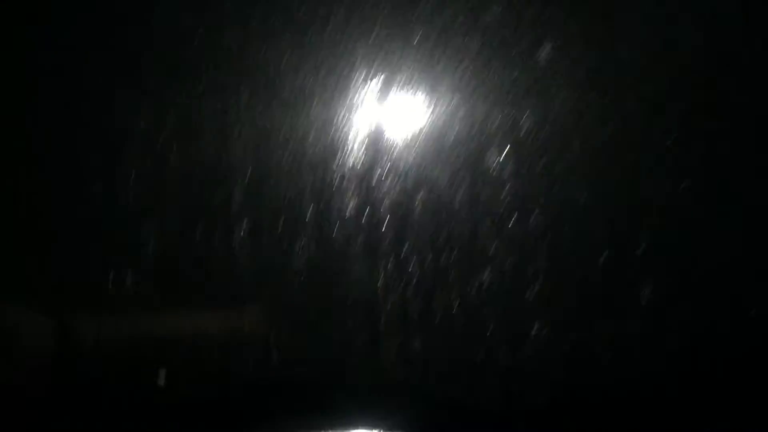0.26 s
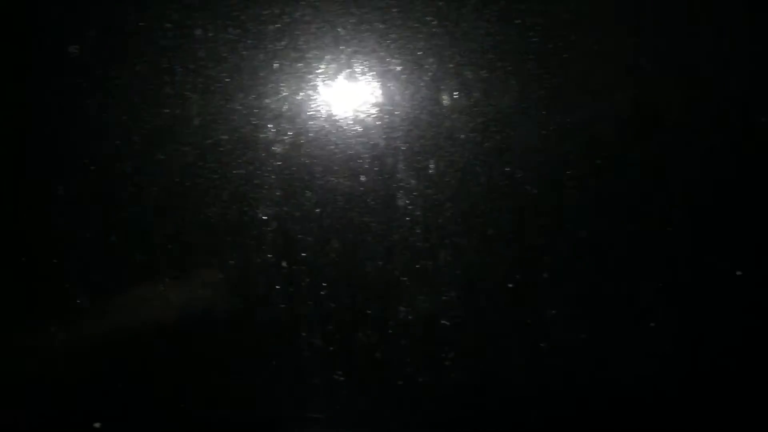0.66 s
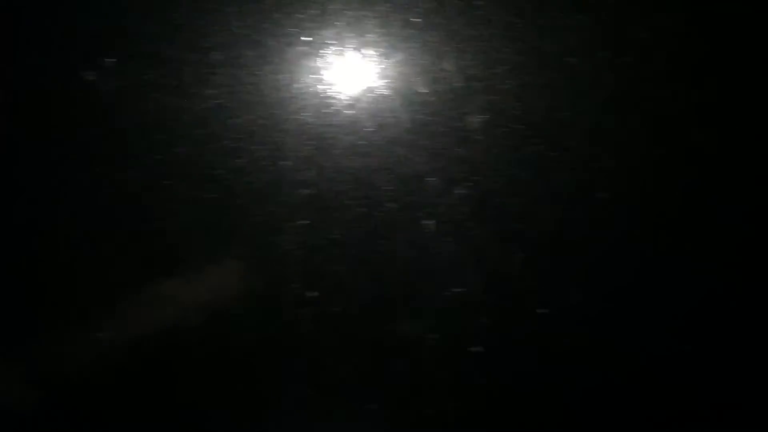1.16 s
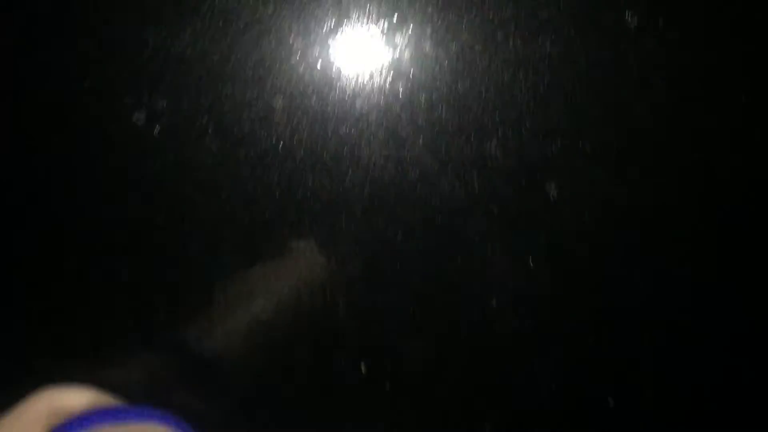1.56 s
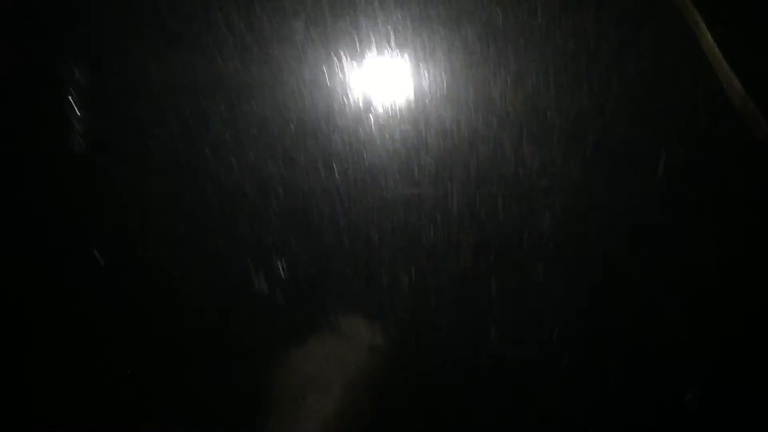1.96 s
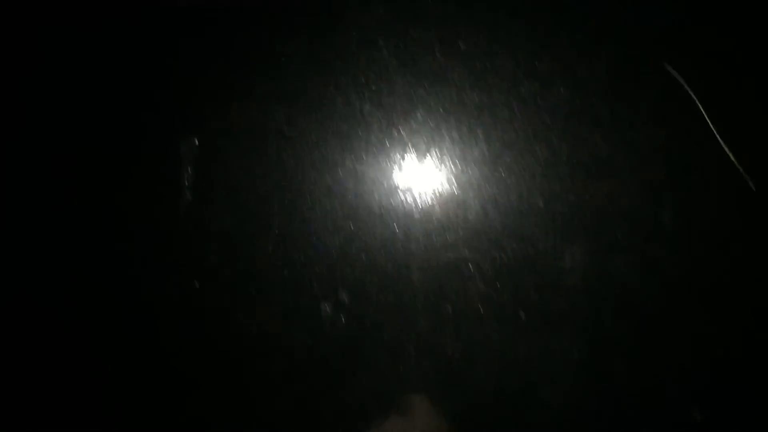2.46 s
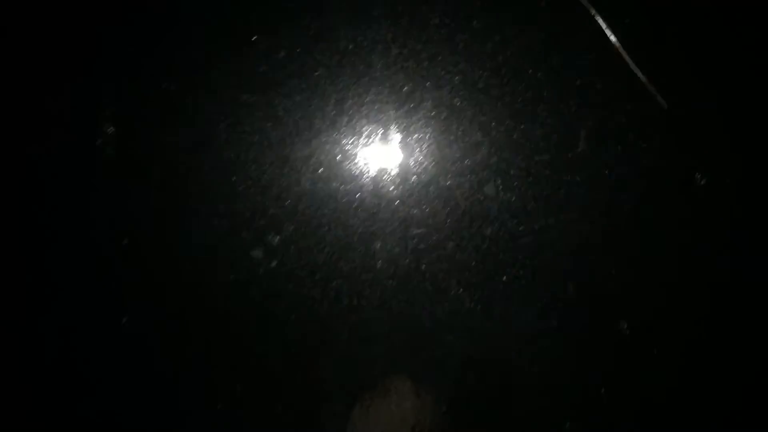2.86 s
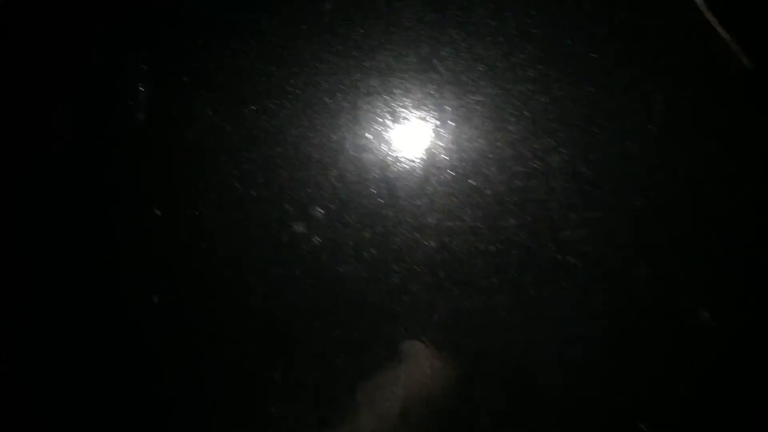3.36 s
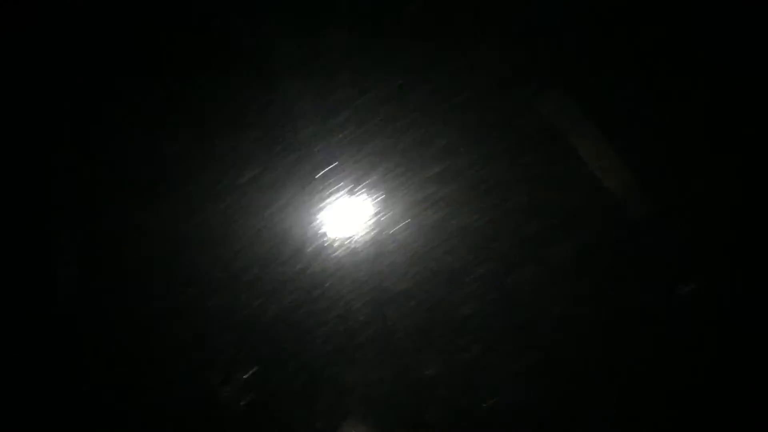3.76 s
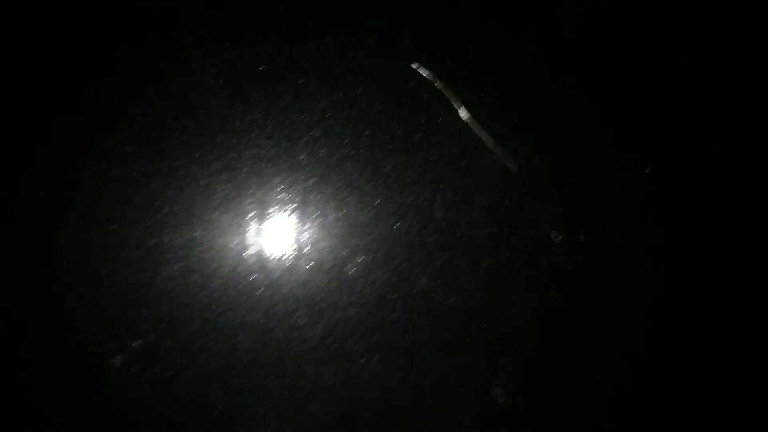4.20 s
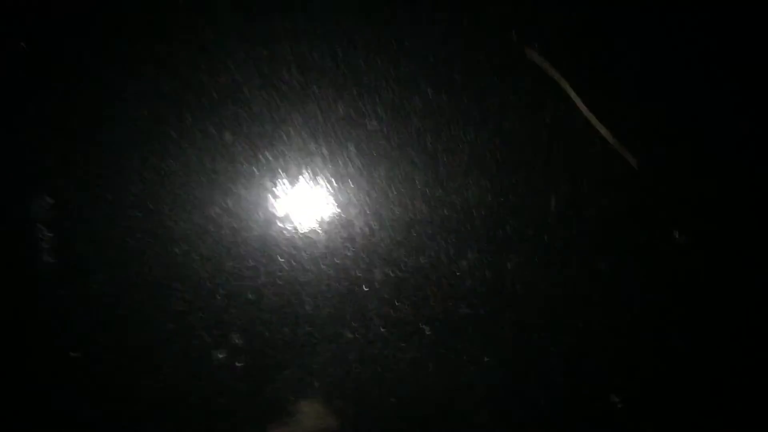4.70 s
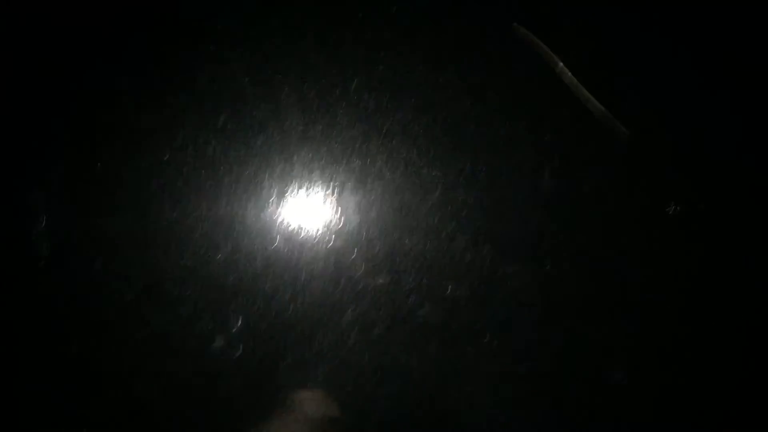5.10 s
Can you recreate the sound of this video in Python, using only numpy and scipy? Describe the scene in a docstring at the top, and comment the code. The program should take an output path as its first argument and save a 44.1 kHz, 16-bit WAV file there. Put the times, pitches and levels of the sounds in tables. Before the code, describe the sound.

Night outdoors, nearly silent, with a faint even hush of air and a close microphone. Tiny dry metal ticks begin near 0.1 s; soft, muffled snow presses come at 0.55, 1.0, 1.1 and 1.6 s, with a brittle, briefly ringing snap at 0.96. At 2.07 s the loudest step breaks through: a hard crack, deep thud, coarse crunch and fizzing ice grains, dying within about a quarter second. Small high clicks and faint creaks follow around 2.3-2.6 s. A duller double step lands at 3.1-3.2 s with little cracks, then a strong, crisp crunch at 3.57. Quiet metal ticks and soft creaking fill the gap until a moderate, low step at 4.6. From 4.9 s muffled steps bunch together, with light rattling ticks between them; a sharper crunch and snap at 5.23 and a faint last press at 5.3 end it.

```python
"""Footsteps in crusted snow on a still night: each boot breaks the crust in bursts of tiny fractures.
Random impulses, shaped by the boot's force and by filters, give a low thud, a crunch and fizzing ice grains.
Single plates crack, and brittle pieces snap with a noise burst and a few ringing sine tones.
The settling snow creaks in filtered small slips. A small metal part, like a zip pull, clicks and rings.
Behind it all lies the faint hush of the open air, made of filtered noise."""
import sys
import numpy as np
from scipy import signal
from scipy.fft import rfft, irfft, next_fast_len
from scipy.io import wavfile
from scipy.ndimage import uniform_filter1d, map_coordinates

SR = 44100
rng = np.random.default_rng(int(sys.argv[2]) if len(sys.argv) > 2 else 0)


def materialize(psi):
    """Save the field psi as 16-bit PCM at rate SR to the path in sys.argv[1].

    A 1-D psi becomes a single channel; in a 2-D psi each row is a channel.
    """
    bounded = np.clip(np.atleast_2d(psi).T, -1, 1)
    quanta = np.round(bounded * 32767).astype(np.int16)
    wavfile.write(sys.argv[1], SR, quanta)


N = 235561
T = np.arange(SR // 2) / SR  # seconds within one event

# Tone of the open air. Each row: frequency in Hz, gain in dB.
AIR_TONE = [(15, -59), (25, -21), (76, 0.5), (242, -6.5), (335, -6.5), (439, -11.5), (962, -8), (1130, -11),
            (1400, -13.5), (2410, -18.5), (6050, -25), (7510, -26.5), (14400, -31.5), (16000, -34)]
# Moments when the weight shifts. Each row: start in seconds, length in seconds, creak level in dB.
WEIGHT_SHIFTS = [(0.669, 0.11, -51), (2.263, 0.073, -47), (2.414, 0.093, -49.5), (3.764, 0.13, -51),
                 (3.964, 0.047, -51), (4.766, 0.047, -58), (4.896, 0.078, -45), (5.138, 0.17, -47)]
# Tone of the creaking snow. Each row: frequency in Hz, gain in dB.
CREAK_TONE = [(24, -14), (40, -17.5), (86, 0.5), (220, -16.5), (334, -1), (396, -24), (463, -18.5),
              (556, -28), (843, -33), (900, -24.5), (1170, -72), (1980, -120)]
# Metal ticks. Each row: start in seconds, click pitch in Hz, click level in dB, ring level in dB.
METAL_TICKS = [(0.069, 6000, -54.5, -54.5), (0.563, 5530, -46.5, -67), (0.724, 5540, -57, -67),
               (1.533, 5500, -59, -78), (2.331, 5390, -49, -76), (2.367, 11780, -51.5, -46),
               (2.38, 5360, -43, -60), (2.572, 12300, -41.5, -35.5), (2.616, 5660, -47.5, -66),
               (3.251, 11800, -53, -68), (3.868, 11530, -43.5, -48), (4.069, 11500, -45, -58.5),
               (4.211, 5460, -51.5, -72), (4.66, 11700, -50, -56.5), (4.867, 5800, -43, -67),
               (4.932, 12000, -42.5, -55.5), (5.048, 12240, -52, -47.5), (5.176, 11700, -46.5, -56)]
# Tone of the dry click. Each row: frequency in Hz, gain in dB.
CLICK_TONE = [(1500, -17), (3500, -9), (5400, 0.5), (7500, -4.5), (9800, -11), (11700, -6), (13000, -9),
              (16000, -14)]
# Ring of the metal part. Each row: frequency in Hz, level in dB, time to fall 60 dB in seconds.
METAL_RING = [(13160, -16, .05), (14200, 1, 0.065)]
# The span in which fainter ticks fall at random: first and last time in seconds.
RATTLE_SPAN = (4.25, 5.25)
# Brittle pieces of crust that snap. Each row: start in seconds, level in dB.
SNAP_EVENTS = [(0.961, -20), (2.0701, -24), (3.174, -35), (5.234, -28.5)]
# Tone of a snapping piece. Each row: frequency in Hz, gain in dB.
BRITTLE_TONE = [(100, -36), (250, -18), (550, -7), (760, -11.5), (1150, 2), (1450, -5.5), (1900, -16.5),
                (3000, -20), (7000, -26.5), (16000, -39)]
# Ring of a snapped piece. Each row: frequency in Hz, level in dB, time to fall 60 dB in seconds.
SHARD_RING = [(1130, -5.5, 0.11), (1907, -23, 0.24), (2380, -13, .07)]
# Tone of the packed snow. Each row: frequency in Hz, gain in dB.
PACK_TONE = [(40, -39.5), (135, -14.5), (180, 2.5), (330, 1.5), (480, -7), (600, -17), (1000, -39.5),
             (3000, -83)]
# Tone of the crust. Each row: frequency in Hz, gain in dB.
CRUST_TONE = [(250, -22), (550, -5.5), (750, 4.5), (1000, 3), (1250, -6.5), (1550, 0.5), (1900, -10),
              (2700, -13.5), (4200, -22.5), (9000, -55)]
# Tone of the ice grains. Each row: frequency in Hz, gain in dB.
GRIT_TONE = [(1200, -48), (3000, 6), (4300, 2.5), (6500, -1.5), (8000, -8.5), (12000, -21.5),
             (16000, -16.5)]
# Tone of the ground under the boot. Each row: frequency in Hz, gain in dB.
PUSH_TONE = [(25, -37.5), (45, -14), (68, -2), (98, 4), (125, -2.5), (170, -23.5), (500, -71.5)]
# Tone of a splitting plate of crust. Each row: multiple of the plate's pitch, gain in dB.
PLATE_TONE = [(.25, -14), (.55, -11), (1, 0.5), (1.5, -12), (2, -23), (5, -50.5)]
# Single cracks in the crust. Each row: start in seconds, level in dB, plate pitch in Hz.
CRACK_EVENTS = [(1.636, -54, 3080), (2.113, -31.5, 2010), (3.2334, -34, 1840), (3.634, -28.5, 1520),
                (4.536, -61.5, 2430), (4.976, -47.5, 2320), (5.032, -49, 2300)]
# Boots pressing down. Each row: start in seconds, sinking time in seconds, weight level in dB,
# crust level in dB, deep push level in dB, pitch of the hollow in Hz, pitch of the plate in Hz.
BOOT_STEPS = [ (0.554, 0.0046, -36.5, -53.5, -42, 326, 1200), (0.964, 0.046, -45, -44.5, -53, 398, 1225),
              (1.13, 0.009, -47.5, -61, -61.5, 268, 1230), (1.635, 0.0021, -39, -54, -57, 290, 693),
              (2.0693, .017, -9, -18.5, -16.5, 186, 1030), (3.0973, 0.046, -16.5, -35.5, -29.5, 215, 1120),
              (3.168, .03, -20.5, -37, -32, 518, 1500), (3.57, 0.046, -13, -20.5, -22, 447, 930),
              (4.617, 0.027, -29.5, -42, -28.5, 331.5, 1650), (4.949, 0.059, -27.5, -47, -40.5, 217, 2320),
              (4.997, 0.042, -20, -41, -32.5, 191, 1310), (5.189, 0.076, -42, -54.5, -38.5, 226, 1470),
              (5.233, 0.019, -17.5, -30, -20.5, 220, 950), (5.314, 0.037, -38.5, -56, -45, 198, 1850)]

AIR_DB = -65.5
RATTLE_HZ, RATTLE_DB, RATTLE_RING_DB = 11760, -58, -66.5  # click pitch, click level, ring level
STEP_T60_S = 0.25  # seconds for the pack to fall 60 dB, alike under every step
# Level at a crust level of 0 dB, then dB gained per dB of crust:
CRACK_DB, CRACK_GROWS = -9.5, 0.72  # the opening crack
GRIT_DB, GRIT_GROWS = -17.5, 1.112  # the ice grains
FIRST_SLIP, POWDER = 7.4, 0.22  # first slip and smooth noise, next to the other slips at rms 1
TOP_HZ = 16000  # nothing is kept from here up


def amp(db):
    """Turn decibels into gain."""
    return 10 ** (np.asarray(db) / 20)


def unit(x):
    """Scale a sound to an average (rms) level of 1."""
    return x / np.sqrt(np.mean(x ** 2) + 1e-20)


def fade(t, t60):
    """Stay at full level before t = 0, then fall 60 dB every t60 seconds."""
    return np.exp(-np.log(1000) * np.maximum(t, 0) / t60)


def add(track, start_s, sound):
    """Mix a sound into the track at start_s seconds."""
    room = track[round(start_s * SR):][:len(sound)]
    room += sound[:len(room)]


def colour(x, points, peak_hz=1, peak_db=0, octaves=0.22):
    """Filter through the (Hz, dB) points, with one optional resonance and no sound ahead of its cause."""
    m = 2 * next_fast_len(len(x) // 2 + SR // 8)
    pitch = np.log2(np.fft.rfftfreq(m, 1 / SR) + 1)
    hz, db = np.transpose(points)
    gain_db = np.interp(pitch, np.log2(hz), db)
    gain_db = gain_db + peak_db / (1 + ((pitch - np.log2(peak_hz)) / octaves) ** 2)
    # folding the cepstrum forward in time gives the minimum-phase filter
    cepstrum = irfft(np.log(amp(gain_db)))
    cepstrum[1:m // 2] *= 2
    cepstrum[m // 2 + 1:] = 0
    response = np.exp(rfft(cepstrum))
    return irfft(rfft(x, m) * response, m)[:len(x)]


def fractures(n, rate, spread_db):
    """Irregular tiny impulses of unequal size, about rate a second, at rms 1."""
    hit = rng.random(n) < rate / SR
    sign = rng.choice([-1, 1], n)
    size = amp(spread_db * np.clip(rng.standard_normal(n), -2, 2))
    return unit(hit * sign * size)


def energy(x):
    """Average power around each moment, over 1/40 s."""
    return np.abs(uniform_filter1d(x ** 2, size=SR // 40, mode="constant"))


def burst(grains, force, points, peak_hz=1, peak_db=0, octaves=0.22):
    """Grains driven by a force ring through a body; the sound takes on the force's energy over time."""
    sound = colour(grains * force, points, peak_hz, peak_db, octaves)
    return sound * np.sqrt(energy(force) / (energy(sound) + 1e-14))


def sines(partials):
    """Ringing tones, each dying away at its own pace."""
    return sum(amp(db) * fade(T, t60) * np.sin(2 * np.pi * hz * T) for hz, db, t60 in partials)


def night():
    """The faint, even hush of the open air: filtered noise."""
    return amp(AIR_DB) * unit(colour(rng.standard_normal(N), AIR_TONE))


def settling(attack=0.026, t60=0.24):
    """Shifting weight makes the pack creak softly in small slips."""
    t = np.arange(N) / SR
    weight = np.zeros(N)
    for start, length, db in WEIGHT_SHIFTS:
        rise = np.clip(1 + (t - start) / attack, 0, 1)  # full level at the start time
        weight += amp(db) * rise * fade(t - start - length, t60)
    slips = fractures(N, rate=500, spread_db=2)
    return weight * unit(colour(slips, CREAK_TONE))


def ticks(t60=0.02, pitch_db=7, pitch_octaves=0.084, count=7):
    """Each contact of the metal part is a dry click and a very high, short ring."""
    out = np.zeros(N)
    rattle = [(s, RATTLE_HZ, RATTLE_DB, RATTLE_RING_DB) for s in rng.uniform(*RATTLE_SPAN, count)]
    for start, click_hz, click_db, ring_db in list(METAL_TICKS) + rattle:
        noise = rng.standard_normal(len(T))
        click = burst(noise, fade(T, t60), CLICK_TONE, click_hz, pitch_db, pitch_octaves)
        add(out, start, amp(click_db) * click + amp(ring_db) * sines(METAL_RING))
    return out


def snaps(hold=0.005, t60=0.052, splinter_db=-20, splinter_t60=0.19):
    """A brittle piece parts in a few milliseconds, rings and splinters briefly."""
    out = np.zeros(N)
    rise = np.minimum(T / 0.002, 1)
    force = rise * (fade(T - hold, t60) + amp(splinter_db) * fade(T, splinter_t60))
    ring = rise * sines(SHARD_RING)
    for start, db in SNAP_EVENTS:
        snap = burst(rng.standard_normal(len(T)), force, BRITTLE_TONE)
        add(out, start, amp(db) * (snap + ring))
    return out


def scattered(x, share=0.37, spread=0.03, count=8):
    """Boots, legs and nearby snow banks return a few weak copies within some hundredths of a second."""
    out = x.copy()
    for when, size in zip(rng.random(count), rng.standard_normal(count)):
        weakening = share * (1 - when / 2)  # later copies tend to be weaker
        add(out, 0.002 + spread * when, weakening * np.clip(size, -1, 1) * x)
    return out


def clumps(rate, depth_db):
    """An uneven gain: crystals fail in clusters, about rate a second."""
    knots = np.clip(rng.standard_normal(int(rate) + 4), -1.5, 1.5)
    return amp(depth_db * map_coordinates(knots, [T * rate]))


def crust_grains():
    """The slips of crumbling snow, and the finer ice grains that break with them."""
    slips = fractures(len(T), rate=600, spread_db=0.5)
    slips[SR // 1000] += FIRST_SLIP  # one millisecond in
    crumble = scattered(slips + POWDER * rng.standard_normal(len(T)))
    fine = scattered(fractures(len(T), rate=2000, spread_db=5))
    return crumble, 0.6 * crumble + fine


def crack(ice, plate_hz, hold=0.0042, t60=0.03, ring_db=6, ring_octaves=0.08):
    """A plate of crust splits at once and rings briefly at its own pitch."""
    tone = [(k * plate_hz, db) for k, db in PLATE_TONE]
    return burst(ice, fade(T - hold, t60), tone, plate_hz, ring_db, ring_octaves)


def cracks(drop_db=3, drop_t60=0.15, spray_db=-22, spray_t60=0.06):
    """A plate breaks under the load: ice sprays and the boot drops a little onto the pack."""
    out = np.zeros(N)
    for start, db, plate_hz in CRACK_EVENTS:
        crumble, ice = crust_grains()
        drop = amp(drop_db) * burst(crumble, fade(T, drop_t60), PACK_TONE)
        spray = amp(spray_db) * burst(ice, fade(T, spray_t60), GRIT_TONE)
        add(out, start, amp(db) * (crack(ice, plate_hz) + drop + spray))
    return out


def steps(hollow_db=7, hollow_octaves=0.16, plate_db=4, plate_octaves=0.12,
          crust_life=0.78, grit_life=0.92, crust_hold=0.8):
    """Each step starts with a crack, crumbles on while the boot sinks, then dies away."""
    out = np.zeros(N)
    bite = 1 - np.exp(-T / 0.0011)  # a quick but soft start
    for start, hold, weight_db, crust_db, push_db, hollow_hz, plate_hz in BOOT_STEPS:
        crumble, ice = crust_grains()
        weight = bite * fade(T - hold, STEP_T60_S)
        grind = bite * clumps(rate=150, depth_db=2.6)
        push = amp(push_db) * burst(crumble, weight, PUSH_TONE)
        # the hollow under the sole booms
        thud = amp(weight_db) * burst(crumble, weight, PACK_TONE, hollow_hz, hollow_db, hollow_octaves)
        # the plate of crust splits, then rings as it is ground down
        split = amp(CRACK_DB + CRACK_GROWS * crust_db) * crack(ice, plate_hz)
        # crust and grains stop sooner than the pack
        crushed = T - crust_hold * hold
        crust_force = grind * fade(crushed, STEP_T60_S * crust_life)
        crunch = burst(crumble, crust_force, CRUST_TONE, plate_hz, plate_db, plate_octaves)
        crunch = amp(crust_db) * crunch
        grit_force = grind * fade(crushed, STEP_T60_S * grit_life)
        grit = amp(GRIT_DB + GRIT_GROWS * crust_db) * burst(ice, grit_force, GRIT_TONE)
        add(out, start, push + thud + split + crunch + grit)
    return out


def scene():
    """All layers are summed; the short echoes are already in the steps and cracks."""
    return (steps() + cracks() + snaps() + settling() + ticks() + night())[None]


def record(dry):
    """The microphone loses the deepest bass, rounds off the highest peaks and stops at its band limit."""
    bass_cut = signal.butter(2, 35, "highpass", fs=SR, output="sos")
    thin = signal.sosfilt(bass_cut, dry)
    held = thin / (1 + np.abs(thin / 0.95) ** 6) ** (1 / 6)  # peaks level off below 0.95
    m = next_fast_len(N + SR // 4)
    in_band = np.fft.rfftfreq(m, 1 / SR) < TOP_HZ
    return irfft(rfft(held, m) * in_band, m)[..., :N]


dry = scene()
out = record(dry)
materialize(out)
```